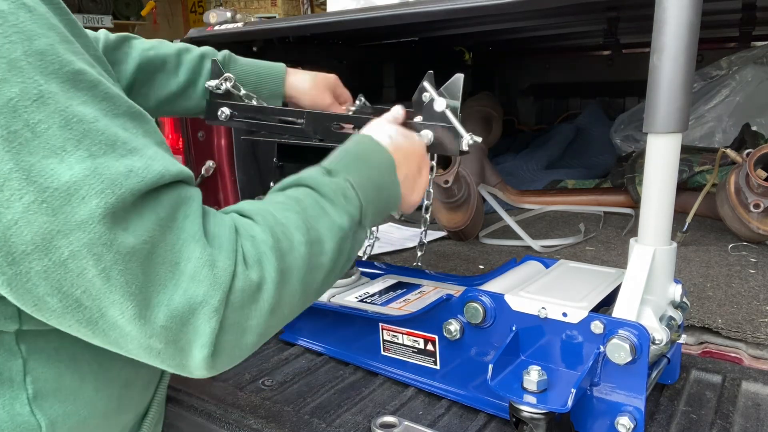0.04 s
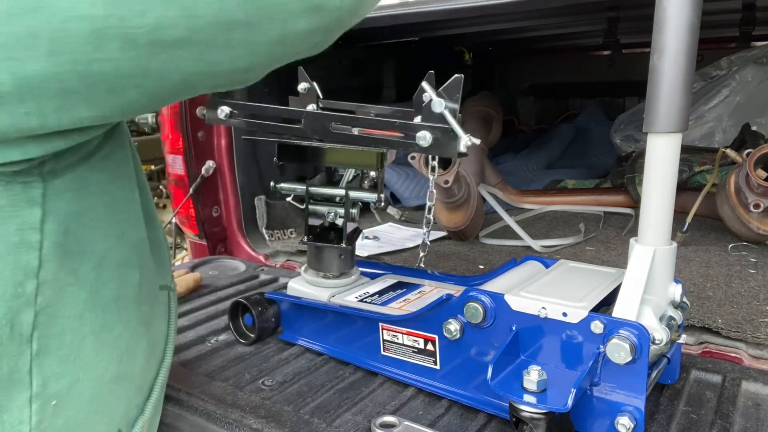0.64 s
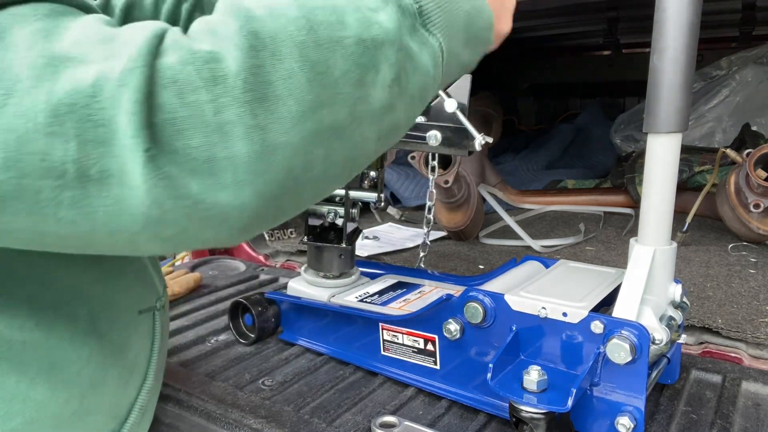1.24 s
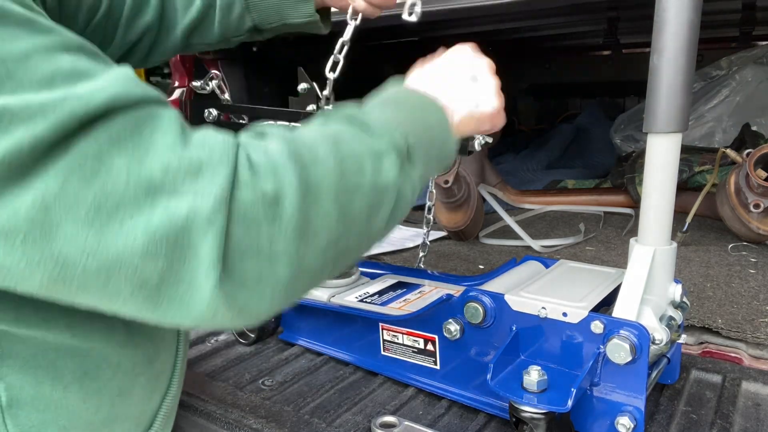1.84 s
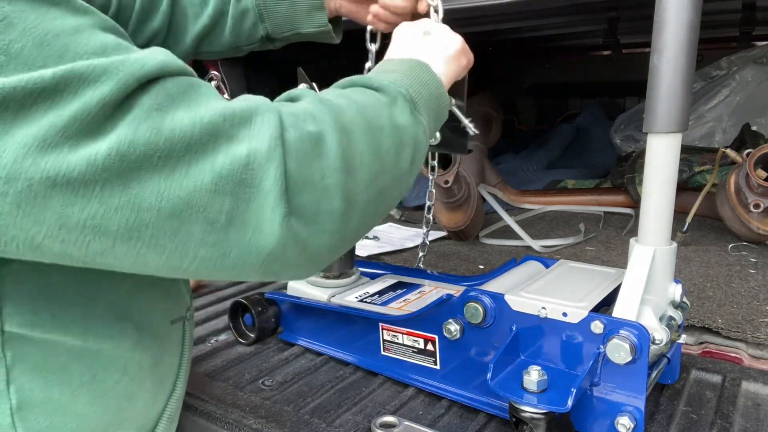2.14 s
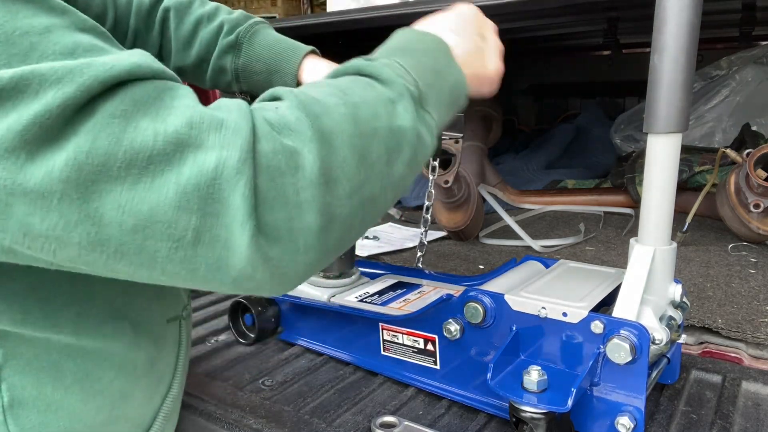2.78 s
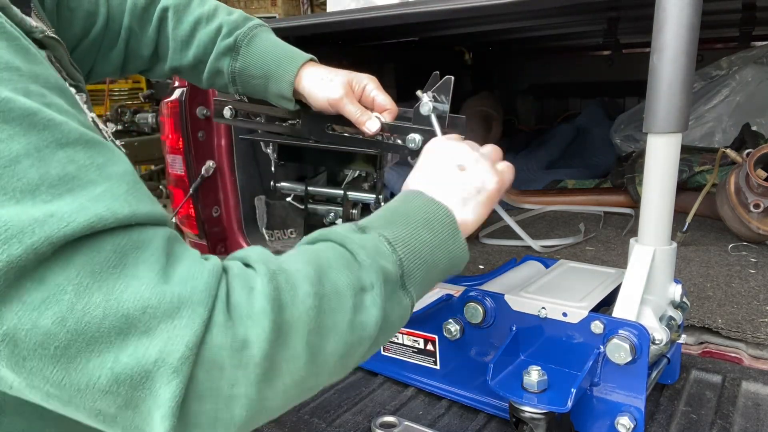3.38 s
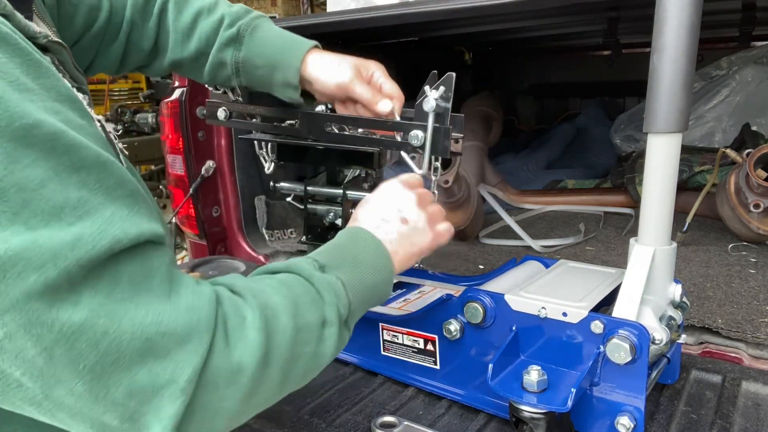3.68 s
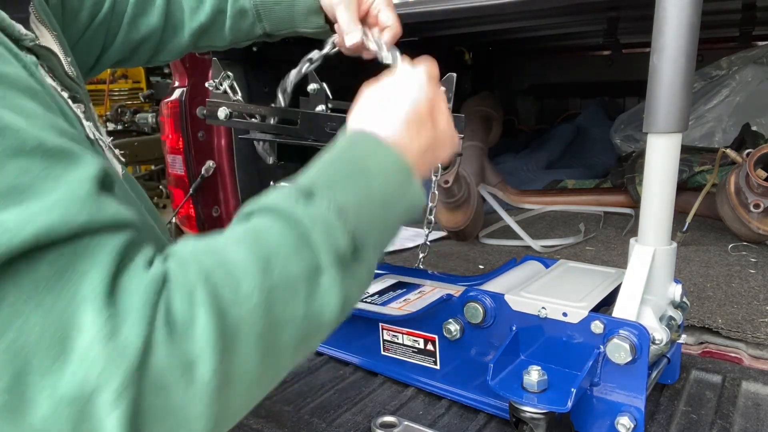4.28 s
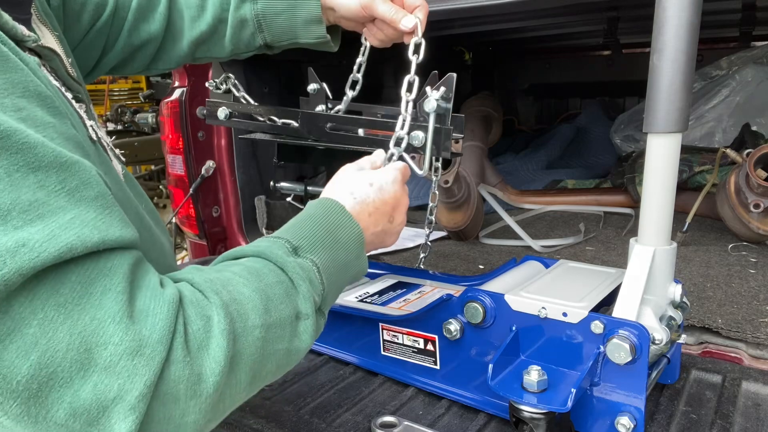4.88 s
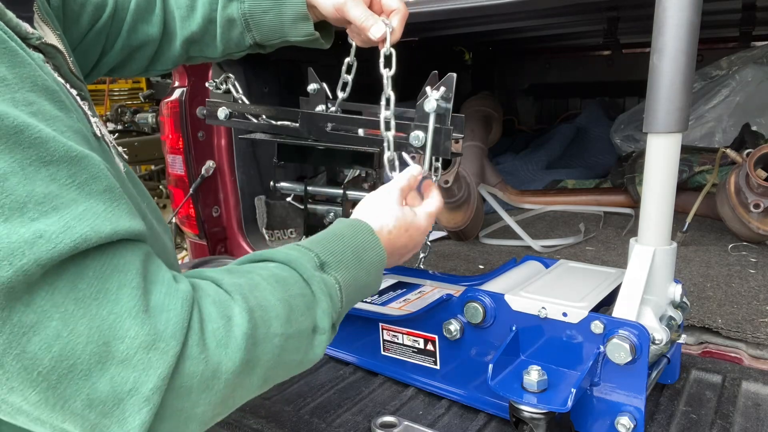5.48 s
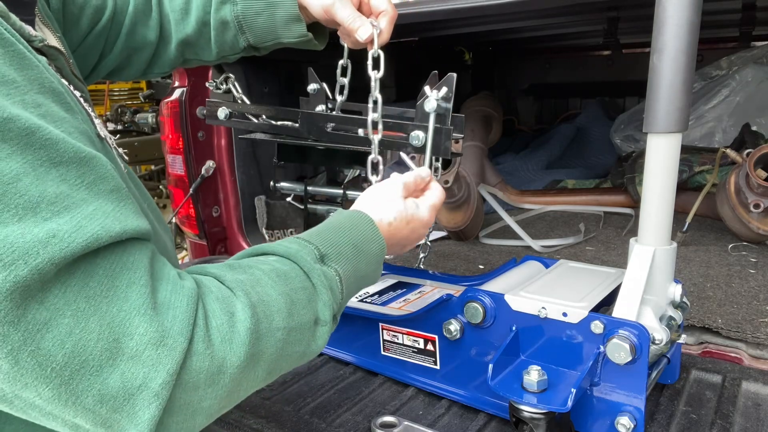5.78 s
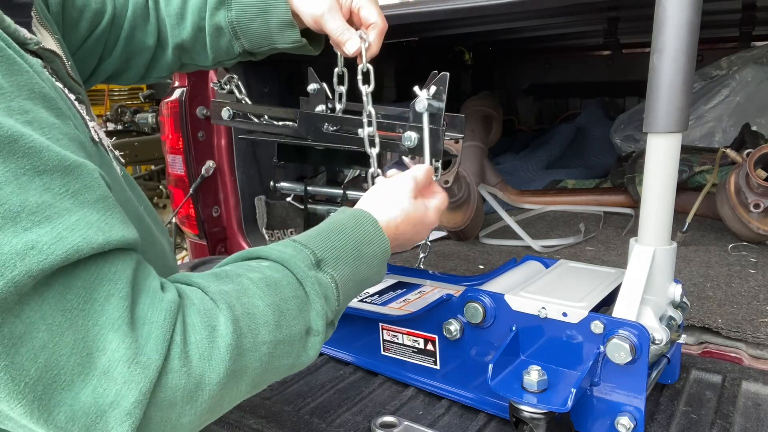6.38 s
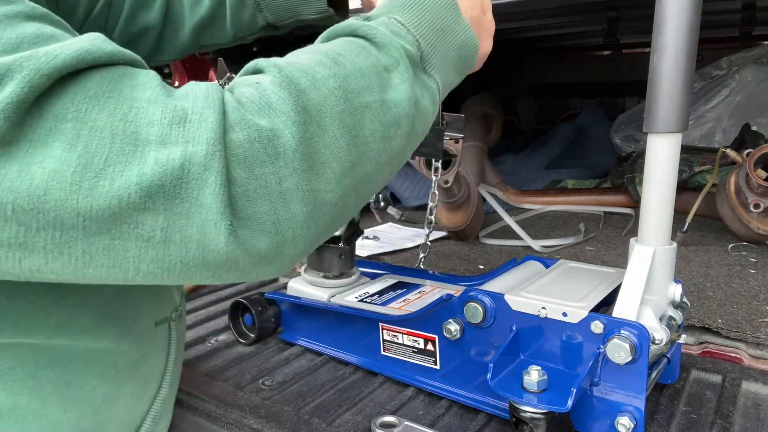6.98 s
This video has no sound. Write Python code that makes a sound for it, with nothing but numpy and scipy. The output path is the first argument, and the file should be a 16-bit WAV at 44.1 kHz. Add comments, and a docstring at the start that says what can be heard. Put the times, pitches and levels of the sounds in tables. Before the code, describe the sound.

Chain links are lifted and dropped on a steel frame, clinking brightly and rasping, while sleeves rustle over a low outdoor rumble.

```python
"""In a covered truck bed, steel chains are lifted, dropped and threaded on the cradle of a load leveller.
Each clink is a chatter of contacts that rings short link modes; blows on the steel cradle and an end
bracket ring longer. Slack links jingle, slide and rasp over the edge, sleeves rustle and the cradle
knocks on its jack. The stereo microphone hears the steel directly and off the walls of the bed;
from outdoors come a low rumble and, far off, a faint whine and two whistles."""
import sys
import numpy as np
from scipy import signal
from scipy.fft import rfft, irfft, next_fast_len
from scipy.io import wavfile
from scipy.ndimage import uniform_filter1d

SR = 44100
rng = np.random.default_rng(int(sys.argv[2]) if len(sys.argv) > 2 else 0)


def waveform_to_disk(signal):
    """Save audio, clipped to [-1, 1], as 16-bit WAV at the path in sys.argv[1]."""
    frames = np.transpose(np.atleast_2d(signal))
    scaled = np.clip(frames, -1, 1) * 32767
    samples = np.round(scaled).astype(np.int16)
    wavfile.write(sys.argv[1], SR, samples)


N = 310023
TIME = np.arange(N) / SR


def undb(db):
    """Decibels to amplitude."""
    return 10 ** (np.asarray(db) / 20)


def unit(x):
    """Scale to an energy of 1."""
    return x / np.sqrt(np.sum(x ** 2) + 1e-18)


def level(x, db):
    """Scale to an rms level."""
    return x * undb(db) / np.sqrt(np.mean(x ** 2))


def fade(t, t60):
    """Exponential decay, 60 dB down after t60 seconds."""
    return np.exp(-np.log(1000) * t / max(t60, 1e-3))


def colour(x, points):
    """Causal filter through (frequency [Hz], gain [dB]) points."""
    size = 2 * next_fast_len(x.shape[-1] // 2 + 1024)
    hz, db = np.transpose(points)
    bin_hz = np.arange(size // 2 + 1) * SR / size
    gain = undb(np.interp(np.log(bin_hz + 1), np.log(hz), db))
    cepstrum = irfft(np.log(gain))
    cepstrum[1:size // 2] *= 2  # fold onto positive time: minimum phase
    cepstrum[size // 2 + 1:] = 0
    return irfft(rfft(x, size) * np.exp(rfft(cepstrum)), size)[..., :x.shape[-1]]


def add(track, s, sound):
    """Mix a sound in at s seconds."""
    start = max(int(s * SR), 0)
    track[:, start:start + sound.shape[1]] += sound[:, :N - start]


def walk(per_s):
    """Smooth random wandering with a spread near 1."""
    hold = max(int(SR / per_s), 1)
    steps = rng.standard_normal(N)[np.arange(N) // hold]
    return 1.4 * uniform_filter1d(uniform_filter1d(steps, hold), hold)


def stereo_noise(spectrum, side_db):
    """Coloured noise whose side signal sets its width."""
    mid, side = colour(rng.standard_normal((2, N)), spectrum)
    return level(mid + undb(side_db) * side * np.array([[1], [-1]]), 0)


def gestures(moves, attack_s, t60):
    """Loudness of (time [s], length [s], level [dB]) movements: each swells, holds and dies away."""
    return sum(undb(db) * np.clip((TIME - s) / attack_s, 0, 1)
               * fade(np.maximum(TIME - s - length, 0), t60) for s, length, db in moves)


def swells(moves):
    """Loudness of (time [s], level [dB], half length [s]) movements that rise and fall evenly."""
    return sum(undb(db) * np.exp(-((TIME - s) / half) ** 2) for s, db, half in moves)


def ring(modes, t, detune, scatter_db):
    """Decaying modes; the point of contact decides how strongly each one speaks."""
    chance = rng.standard_normal((len(modes), 3))
    return unit(sum(undb(db + scatter_db * strength) * fade(t, t60)
                    * np.sin(2 * np.pi * hz * (1 + detune * offset) * t + np.pi * phase)
                    for (hz, db, t60), (strength, offset, phase) in zip(modes, chance)))


def chatter(body, ms, bounce_db, per_ms):
    """Ring a body with a first contact and uneven rebounds."""
    when, strength = rng.random(64), rng.standard_normal(64)
    happens = np.clip(1 + ms * per_ms - np.arange(len(when)), 0, 1)
    contacts = np.zeros(len(body))
    contacts[0] = 1
    np.add.at(contacts, (when * ms * SR / 1000).astype(int), undb(bounce_db) * strength * happens)
    return unit(signal.fftconvolve(contacts, body)[:len(body)])


# Sound bending round the body of the microphone: (frequency [Hz], lead of the left port [rad])
PORT_LEAD = [(0, -0.5), (600, -0.5), (2500, -1.55), (3700, -1.33), (5200, -2.5), (6700, -1), (8800, 1),
             (10000, 3), (12100, 7.5)]
def place(sound, walls_db=-3.0, walls_t60=0.059):
    """Two ports hear the direct sound, then reflections off jack and bed that differ with each spot."""
    size, t = 2 * len(sound), np.arange(len(sound)) / SR
    lead = np.interp(np.arange(len(sound) + 1) * SR / size, *np.transpose(PORT_LEAD))
    direct = np.exp(.5j * np.array([lead, -lead]))
    walls = [rfft(unit(rng.standard_normal(len(t)) * fade(t, walls_t60)), size) for _ in range(2)]
    paths = direct + undb(walls_db) * np.array(walls)
    return np.sqrt(2) * unit(irfft(rfft(sound, size) * paths)[:, :len(sound)])


# An arm reaching across the bed: (time [s], length [s], sleeve level [dB], load level [dB])
REACHES = [(-.05, 0.26, -39.5, -48.5), (0.652, 0.094, -54.5, -51), (1.1, 1, -59.5, -65),
           (2.252, 0.57, -51.5, -52.5), (3.3, 0.043, -47, -47), (3.65, 1.22, -54.5, -62.5),
           (5.204, 1.08, -63, -62.5), (6.54, 0.61, -54, -51)]
# Spectra of the sleeve and of the shifting load: (frequency [Hz], level [dB])
SLEEVE_SPECTRUM = [(150, -20), (400, 5.5), (800, 6.5), (1600, 0.5), (3000, -5.5), (7000, -14.5),
                   (14000, -26)]
LOAD_SPECTRUM = [(60, -13.5), (120, 2.5), (180, -1.5), (280, -15.5), (500, -28), (2000, -54)]
def arms(attack_s=0.067, t60=1.37):
    """Sleeves brush in fits and starts; the load is dragged along with a low rumble."""
    brushing = gestures([(s, length, db) for s, length, db, _ in REACHES], attack_s, t60)
    dragging = gestures([(s, length, db) for s, length, _, db in REACHES], attack_s, t60)
    sleeve = stereo_noise(SLEEVE_SPECTRUM, side_db=2.5) * brushing * undb(3.1 * walk(60))
    load = stereo_noise(LOAD_SPECTRUM, side_db=-12.0) * dragging * undb(2 * walk(25))
    return sleeve + load


# The outdoors, heard from under the cover: (frequency [Hz], level [dB])
RUMBLE_SPECTRUM = [(20, -32.5), (45, -4.5), (70, 3), (110, -3), (200, -14), (350, -24), (800, -26.5),
                   (1600, -29.5), (2600, -33.5), (4500, -70), (9000, -49.5), (15000, -71.5)]
def outdoors():
    """A slowly swelling rumble, with a faint wavering whine and two whistles far off."""
    whine_hz = 1550 * (1 + 0.0094 * walk(160))
    whine = np.sin(2 * np.pi * np.cumsum(whine_hz) / SR) * undb(-75.5 + 4.2 * walk(5.2))
    whistles = whistle(FALLING_WHISTLE) + whistle(LOW_WHISTLE)
    rumble = stereo_noise(RUMBLE_SPECTRUM, side_db=-9.5) * undb(-50.5 + 0.37 * walk(1.3))
    return rumble + whine + whistles


# Modes of a link, a little different for each one: (frequency [Hz], level [dB], t60 [s])
LINK_MODES = [(1262, -13, .06), (1702, -16, .045), (2530, -5.5, .06), (3500, -4, .05), (3945, 4, .055),
              (4740, -1, .06), (6158, -3, .06), (7340, 4, .055), (7544, 4, .05), (8204, 3, .08),
              (9100, -2, .05), (11800, 1, .05), (12800, 1.5, .05), (13700, -5, .04)]
# The crack of steel on steel: (frequency [Hz], level [dB])
CRACK_SPECTRUM = [(150, -31.5), (400, -10.5), (750, -1.5), (1400, 1.5), (3000, 4), (5200, 7), (8000, 2),
                  (9500, 3), (10400, -11), (12200, -9.5), (13900, -27.5), (15400, -55)]
def link(t, crack_db, crack_t60, tick_db, tick_t60):
    """One link struck: a hard tick, its own modes and the dense, damped ring of the steel it touches."""
    noise = rng.standard_normal(len(t))
    crack = unit(colour(noise * fade(t, crack_t60), CRACK_SPECTRUM))
    tick = unit(colour(np.diff(noise, prepend=0) * fade(t, tick_t60), CRACK_SPECTRUM))
    modes = ring(LINK_MODES, t, detune=.018, scatter_db=4)
    return unit(modes + undb(crack_db) * crack + undb(tick_db) * tick)


# Slack chain shaken in the bed: (time [s], length [s], level [dB])
SHAKES = [(0, 0.41, -44.5), (0.4, .7, -53.5), (1.425, 0.099, -29), (2.14, 0.15, -49), (2.44, 0.24, -36),
          (3.12, 0.1, -52.5), (3.83, 0.22, -51), (4.2, .5, -47), (4.91, 0.067, -54), (6.58, .06, -56),
          (6.87, 0.05, -41.5)]
# Chain running through a hand or over an edge: (time [s], level [dB], half length [s])
SLIDES = [(0.723, -37.5, 0.0085), (0.8, -37, 0.014), (1.682, -37, 0.016), (1.941, -38, 0.022),
          (2.128, -42.5, 0.092), (2.402, -34, 0.035), (2.62, -32.5, 0.014)]
def agitation():
    """How hard the slack links move: shaken by hand, sliding, or stirred by a clink next to them."""
    shaken = gestures(SHAKES, attack_s=0.059, t60=0.76)
    stirred = np.zeros((1, N))
    settling = fade(np.arange(SR)[None] / SR, t60=.3)
    for s, db, *_ in CLINKS:
        add(stirred, s, undb(db - 25) * settling)
    return np.sqrt(shaken ** 2 + swells(SLIDES) ** 2 + stirred[0] ** 2)


def jingle(base_per_s, crowding, spread_db, links):
    """Slight, bright contacts among slack links: single ticks at rest, a dense rattle when they move."""
    out, t = 0, np.arange(SR // 6) / SR
    loudness = agitation()
    busy = (loudness / undb(-40) + .01) ** crowding  # multiplies the rate of contacts
    for _ in range(links):
        touches = rng.random(N) < busy * base_per_s / links / SR
        strength = undb(spread_db * np.minimum(rng.exponential(size=N), 3))
        contacts = level(touches * strength / np.sqrt(busy), 0) * loudness
        steel = link(t, crack_db=2, crack_t60=0.025, tick_db=-6, tick_t60=0.003)
        cradle = undb(-8.5) * ring(CRADLE_MODES, t, detune=0, scatter_db=1)
        out = out + signal.oaconvolve([contacts], place(steel + cradle), axes=1)[:, :N]
    return colour(out / np.sqrt(links), [(1000, -0.59), (5000, 0.19), (9000, -0.49), (13000, 1.0)])


# Dull knocks down at the jack: (time [s], peak level [dB], boom gain [dB])
KNOCKS = [(0.002, -27, 2), (0.064, -22.5, -23), (0.141, -14, -10), (0.177, -12, -24), (0.249, -10.5, -31.5),
          (0.474, -17, 2), (2.377, -36.5, 14.5), (3.325, -34, 6.5)]
# Spectra of the knock and of the bed under it: (frequency [Hz], level [dB])
KNOCK_SPECTRUM = [(60, -10.5), (200, -23), (500, 2), (1000, 9), (2000, 1), (4000, -13.5), (10000, -41)]
BOOM_SPECTRUM = [(40, -23.5), (100, -13), (180, 7), (300, -10), (450, 1.5), (800, -22.5), (3000, -53.5)]
def knocks():
    """The cradle bumps on the jack, and the bed booms below it."""
    out, t = np.zeros((2, N)), np.arange(SR // 3) / SR
    for s, db, boom_db in KNOCKS:
        knock_noise, boom_noise = rng.standard_normal((2, len(t)))
        impact = unit(knock_noise * fade(t, 0.051)) + undb(-0.5) * (t == 0)
        knock = unit(colour(impact, KNOCK_SPECTRUM))
        boom = colour(boom_noise * fade(t, 0.39), BOOM_SPECTRUM)
        sound = place(knock, walls_db=-3.5) + undb(boom_db) * place(boom, walls_db=-4)
        add(out, s, sound * undb(db) / np.abs(sound).max())
    return out


# Modes of the steel cradle: (frequency [Hz], level [dB], t60 [s])
CRADLE_MODES = [(690, -19, .22), (835, -16, .14), (1250, -9, .14), (1555, -18, .33), (2290, -7, .13),
                (2530, -10, .13), (3375, 1, .075), (3410, -8, .15), (3945, -5, .14), (4100, -10, .19),
                (4570, -9, .17), (4727, -10, .17), (7246, -11, .09), (7630, -11, .11), (8080, -8, .13)]
# Chain landing on the cradle: (time [s], level [dB], chatter length [ms], favoured pitch [Hz])
BLOWS = [(0.107, -26, 2, 2200), (0.18, -17.5, 2, 3470), (0.1994, -27, 1.4, 3450), (0.252, -19.5, 5, 1250),
         (0.298, -33, 3.1, 2290), (1.436, -17, 3.9, 3280), (1.4496, -28, 3.9, 1250),
         (1.467, -23.5, 15, 4570), (2.484, -23, 2.5, 3990), (2.509, -29.5, 6, 3330),
         (4.568, -32.5, 3.76, 2530), (4.606, -33.5, 3.6, 2530), (4.85, -41, 4.9, 3400),
         (5.5657, -44.5, 3, 3400), (6.6241, -42.5, 1.8, 4727), (6.7703, -49, 3.08, 4100),
         (6.8531, -33, 2.3, 2290)]
def blows(favour_db=12, favour_octaves=.07, free_ring_db=-31):
    """Links bounce on the cradle, which rings on; the point of contact favours modes near one pitch."""
    out, t = np.zeros((2, N)), np.arange(SR // 3) / SR
    for s, db, ms, favoured_hz in BLOWS:
        modes = [(hz, mode_db + favour_db * np.exp(-(np.log2(hz / favoured_hz) / favour_octaves) ** 2),
                  t60) for hz, mode_db, t60 in CRADLE_MODES]
        # after a heavy blow the chain lies on the steel and damps its first, strong ring
        free_share = min(undb(free_ring_db - db), 1)
        damping = free_share + (1 - free_share) * fade(t, 0.04)
        body = ring(modes, t, detune=.001, scatter_db=2) * damping
        sound = place(chatter(body, ms, bounce_db=-16.5, per_ms=1.0), walls_db=-7.0)
        add(out, s, sound * undb(db) * np.sqrt(SR / 100))  # level over a hundredth of a second
    return out


# Link on link in the bed: (time [s], level [dB], body lift [dB], treble lift [dB], chatter length [ms])
CLINKS = [(0.1701, -26.5, 8, -1, 2.9), (0.179, -20, 11.5, 3.5, 1.72), (0.224, -17.5, 6, -1, 1.83),
          (0.2452, -11, 7, -0.5, 2.88), (0.2493, -16, 8, -4, 3.97), (0.255, -23.5, 12, 6.5, 1.8),
          (0.298, -21, 6.5, 4.5, 1.94), (0.3824, -21, -11, 3.5, 11), (1.186, -47.5, -10, -13, 4.7),
          (1.4196, -12.5, 2, 5, 2.53), (1.4295, -21.5, 2, -3, 2.1), (1.4349, -11, 5.5, 3.5, 3.43),
          (1.4487, -20.5, -9, -3, 7), (1.466, -26, -7, 19, 22), (1.497, -24.5, -1, 10, 3.5),
          (1.506, -24.5, 7.5, -1, 7.1), (1.5579, -35.5, -6, 7, 3.8), (1.5782, -21.5, 5, 7.5, 4.7),
          (1.651, -29.5, 3, -1.5, 20.4), (1.898, -39.5, 7, -6.5, 10.7), (2.1041, -27.5, 19, 3, 15),
          (2.3738, -32, 6, 1.5, 3.1), (2.447, -27.5, 0, -2.5, 3.3), (2.471, -27.5, -3, -3.5, 3.7),
          (2.4838, -15, -17, -10.5, 4.3), (2.502, -24, -16, 6, 9.7), (2.5887, -21.5, 3, 1.5, 0.8),
          (2.5946, -14, -3.5, 3.5, 0.84), (2.6136, -20.5, -8.5, -10, 1.7), (2.6231, -21.5, -9, 5, 3.2),
          (2.629, -20, -21, 14, 2.5), (2.6446, -26.5, -3, 5, 3.6), (2.725, -25.5, -10, -3, 5.4),
          (2.75, -23, -5, 3.5, 1.9), (2.775, -30.5, -29, 5, 1.7), (2.803, -29, 6, 11.5, 3.6),
          (2.881, -36.5, -9, 0.5, 3.8), (3.008, -44, -20, -11, 2.05), (3.1418, -45, 9, -11, 2),
          (3.362, -27, -26, 3, 17.7), (3.4138, -34.5, 0, -2, 4.6), (3.455, -26.5, -8.5, 0, 2.22),
          (3.7118, -34, 0, -10, 8.4), (3.7602, -17, -5.5, 5, 1.34), (3.7736, -21, -8.5, 6, 2.53),
          (3.8671, -34.5, -18, 7.5, 7.2), (3.883, -26.5, -12, -4, 2.3), (3.976, -21, -2, -0.5, 8.2),
          (4.03, -19, -0.5, 0.5, 3.75), (4.104, -36.5, 0.5, -12, 2.6), (4.1426, -38, 6, -6.5, 6.7),
          (4.1864, -25.5, 1, -1.5, 6.7), (4.2264, -30, 2, -1.5, 6.1), (4.2544, -24.5, 5, -5.5, 9.2),
          (4.2919, -12, -5, -1, 2.6), (4.3117, -14.5, 2.5, -2.5, 3.4), (4.3284, -20.5, -5, 0, 2.96),
          (4.4261, -27, 0, 1.5, 10.3), (4.4418, -25.5, 1.5, -2.5, 3.94), (4.4668, -26, 1, -1, 5),
          (4.506, -26, -10, 9, 3.4), (4.5294, -28.5, -7, -7.5, 9.6), (4.567, -20, -11, -8, 9.5),
          (4.606, -35, -10, -4, 4), (4.6674, -18, -9, 2, 2.25), (4.696, -28.5, 0, 1.5, 10),
          (4.7293, -34, -6, 5, 0.57), (4.7999, -28.5, -5, 2, 0.75), (4.814, -43.5, 7, -1, 1.5),
          (4.849, -34, -7, -2, 22), (4.923, -32.5, 0, -5, 7.1), (4.941, -26.5, -1.5, -3, 6),
          (4.9784, -31.5, 3, 1.5, 2.3), (5.0413, -31, 2.5, -5, 5.16), (5.065, -38.5, 10.5, 5, 5.3),
          (5.355, -48.5, -1.5, 0.5, 1.9), (5.5644, -43, -4, 0.5, 3), (6.578, -49, -6, -10.5, 2.7),
          (6.6438, -44, -2, -10, 2.8), (6.8498, -24.5, 2.5, -2.5, 2.26), (6.8797, -26, 6, 5, 3.7),
          (6.8921, -22, 6, 3.5, 5.7), (6.97, -45, -6, 29, 2)]
def clinks():
    """Links chatter on each other; a little of it travels along the chain into the cradle."""
    out, t = np.zeros((2, N)), np.arange(SR // 6) / SR
    for s, db, body_db, treble_db, ms in CLINKS:
        cradle = undb(-14.5) * ring(CRADLE_MODES, t, detune=.003, scatter_db=3)
        steel = link(t, crack_db=0, crack_t60=0.045, tick_db=0, tick_t60=0.007) + cradle
        # hard, light contacts are bright; heavy ones move the whole frame
        tilt = [(1700, body_db), (2700, 0.0018), (5200, 0.0039), (6800, treble_db)]
        clink = colour(chatter(steel, ms, bounce_db=-1.5, per_ms=1.2), tilt)
        add(out, s, place(clink) * undb(db) * np.sqrt(SR / 100))
    return out


# Modes of the bracket at the end of the chain: (frequency [Hz], level [dB], t60 [s])
BRACKET_MODES = [(1034, -9, .06), (3375, 2, .06), (4360, -5, .06), (7246, -1, .08), (9275, -11, .11)]
def bracket(s, db):
    """The end bracket is struck once: a short, high clink that reaches the microphone mostly direct."""
    out, t = np.zeros((2, N)), np.arange(SR // 4) / SR
    modes = ring(BRACKET_MODES, t, detune=0, scatter_db=-1.0)
    crack = unit(colour(rng.standard_normal(len(t)) * fade(t, 0.054), CRACK_SPECTRUM))
    clink = chatter(modes + crack / 2, ms=9.9, bounce_db=-5.5, per_ms=0.76)
    add(out, s, place(clink, walls_db=-17.0) * undb(db) * np.sqrt(SR / 100))
    return out


# Chain across the edge of the cradle: (time [s], level [dB], half length [s])
RASPS = [(0.544, -36.5, 0.0072), (2.1, -36.5, 0.031), (2.535, -34, 0.063), (2.69, -23.5, 0.0069),
         (3.328, -23.5, 0.013), (3.378, -38.5, 0.013)]
# The dullness of a pressed contact: (frequency [Hz], gain [dB])
PRESSED_TILT = [(900, 0), (4300, -1.5), (5600, -3)]
def rasps(grain_db, ring_db):
    """Links catch and slip on the edge in a dense swell of contacts that keeps the cradle ringing."""
    t = np.arange(SR // 4) / SR
    slips = level(rng.standard_normal(N) * undb(grain_db * walk(500)), 0) * swells(RASPS)
    crack = unit(colour(1. * (t == 0), CRACK_SPECTRUM))
    cradle = undb(ring_db) * ring(CRADLE_MODES, t, detune=0, scatter_db=-1.5)
    return signal.oaconvolve([slips], place(colour(crack + cradle, PRESSED_TILT)), axes=1)[:, :N]


# Chain drawn lightly over the sleeve and the bar: (time [s], length [s], level [dB])
SCRAPES = [(0.715, 0.11, -38.5), (0.93, 0.053, -58), (1.325, 0.18, -45.5), (3.095, 0.12, -57.5),
           (3.315, 0.019, -26.5), (6.475, 0.16, -65.5)]
# Its hiss, wide at the microphone: (frequency [Hz], level [dB])
SCRAPE_SPECTRUM = [(1000, -13.5), (3500, -7.5), (7500, 2), (10000, -9), (12500, 0.5), (15500, -11)]
def scrapes(grain_db):
    """Sliding steel catches and slips in fine, bright grains."""
    grains = level(stereo_noise(SCRAPE_SPECTRUM, side_db=0) * undb(grain_db * walk(340)), 0)
    return grains * gestures(SCRAPES, attack_s=0.021, t60=.25)


# Far from the truck, a short low whistle, then a falling one: (time [s], frequency [Hz], level [dB])
LOW_WHISTLE = [(5.231, 1780, -79), (5.301, 1960, -59.5), (5.35, 1940, -85)]
FALLING_WHISTLE = [(5.49, 5070, -77), (5.66, 3670, -72), (5.79, 2990, -62.5), (5.91, 2800, -69),
                   (6.05, 2475, -82.5)]
def whistle(path, flutter=.035, flicker_db=3):
    """A thin, fluttering tone that glides along its path."""
    times, pitches, levels = np.transpose(path)
    hz = np.interp(TIME, times, pitches) * (1 + flutter * walk(480))
    loudness = undb(np.interp(TIME, times, levels) + flicker_db * walk(40))
    sounding = (TIME > times[0]) & (TIME < times[-1])
    return sounding * np.sin(2 * np.pi * np.cumsum(hz) / SR) * loudness


def truck_bed(x, tail_db, tail_t60):
    """The covered bed rings briefly and dully around the microphone."""
    t = np.arange(SR // 2) / SR
    reflections = rng.standard_normal((2, len(t))) * (1 - np.exp(-t / 0.0054)) * fade(t, tail_t60)
    tails = colour(reflections, [(2000, 5.0), (7000, -4.0), (14000, -3.5)])
    return x + undb(tail_db) * signal.oaconvolve(x, np.sqrt(2) * unit(tails), axes=1)[:, :N]


def scene():
    """Chain and cradle sound in the truck bed, slightly to the right, over the arms and the outdoors."""
    slack = jingle(base_per_s=300, crowding=.6, spread_db=5, links=8)
    steel = clinks() + blows() + bracket(s=0.3825, db=-11.5) + slack
    steel += rasps(grain_db=4, ring_db=-5.0) + scrapes(grain_db=5.0) + knocks()
    balance = undb([[-.6], [.4]])
    return truck_bed(steel, tail_db=-15.0, tail_t60=0.18) * balance + arms() + outdoors()


# Response of the microphone: (frequency [Hz], gain [dB])
MICROPHONE_RESPONSE = [(9500, 0), (10200, -7.5), (10900, -10), (11600, -3), (14200, -8), (15500, -17.5)]
def record(dry):
    """The microphone has a dip in the treble, rounds the highest peaks and cuts the top at 16 kHz."""
    top_cut = signal.ellip(8, .2, 70, 16000, fs=SR, output="sos")
    return signal.sosfilt(top_cut, np.tanh(colour(dry, MICROPHONE_RESPONSE)))


dry = scene()
out = record(dry)
waveform_to_disk(out)
```